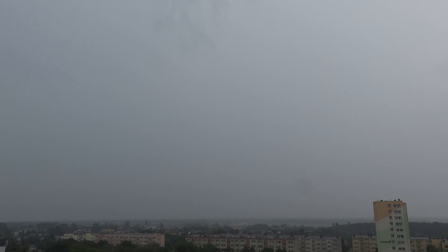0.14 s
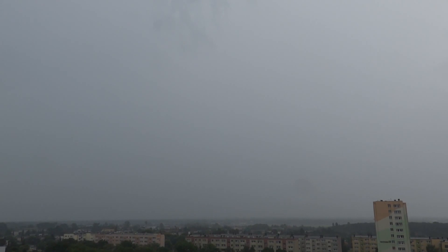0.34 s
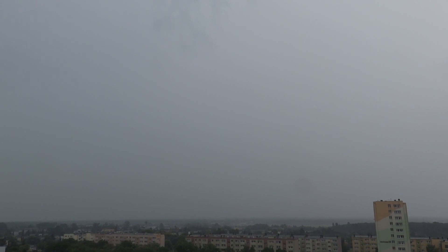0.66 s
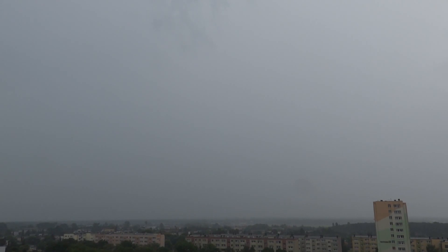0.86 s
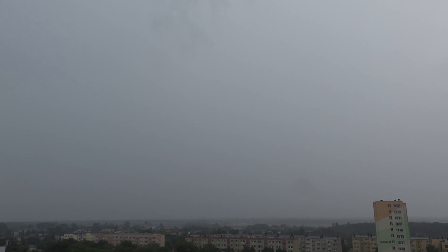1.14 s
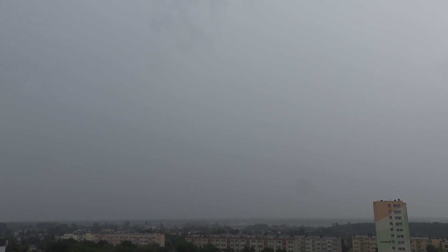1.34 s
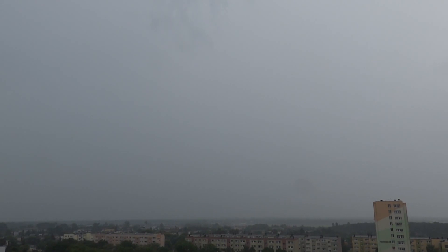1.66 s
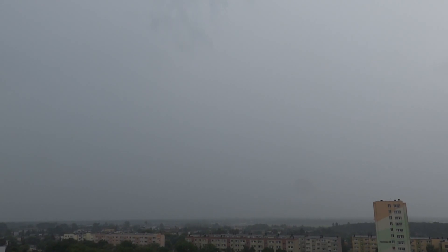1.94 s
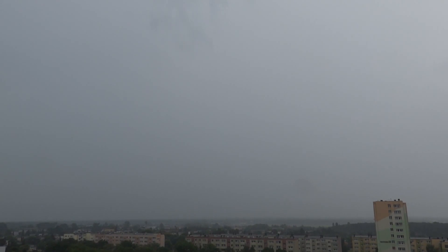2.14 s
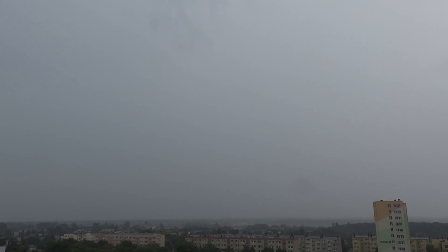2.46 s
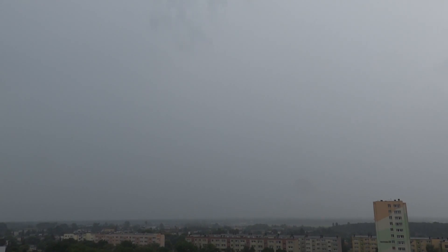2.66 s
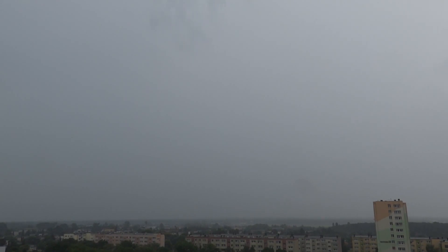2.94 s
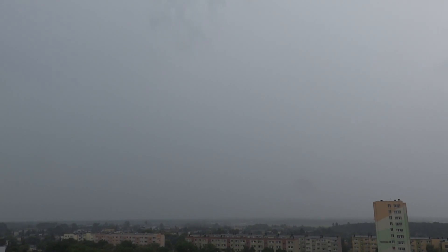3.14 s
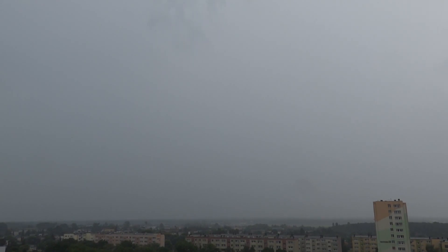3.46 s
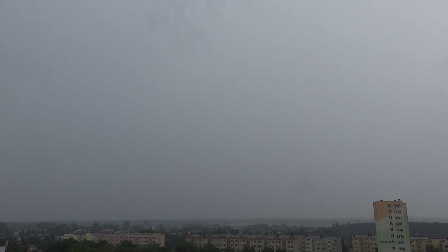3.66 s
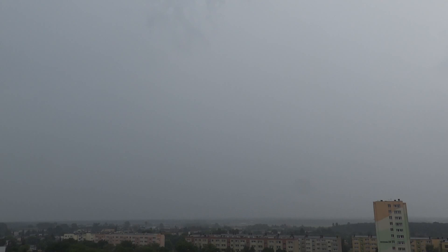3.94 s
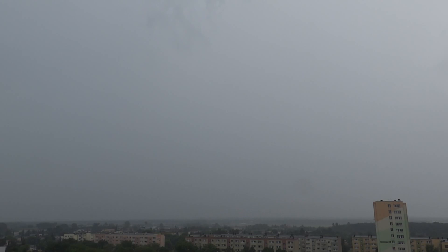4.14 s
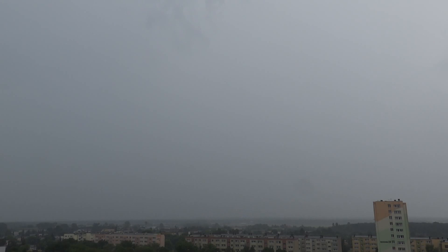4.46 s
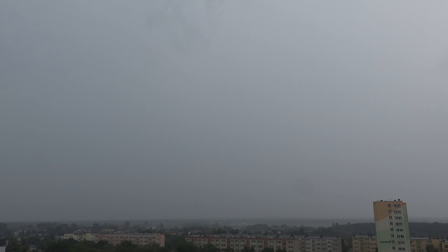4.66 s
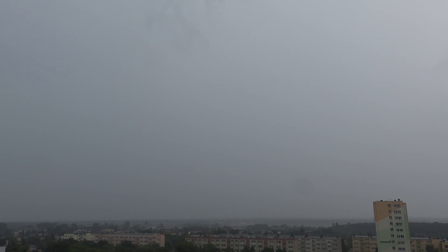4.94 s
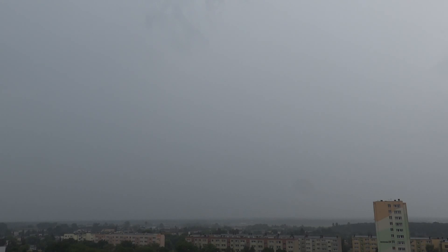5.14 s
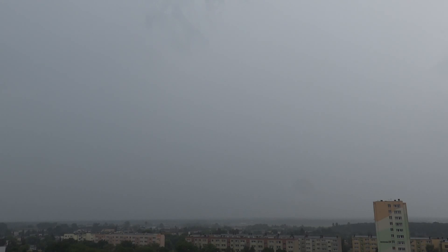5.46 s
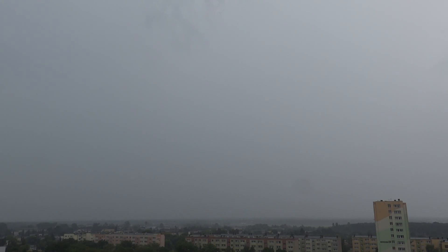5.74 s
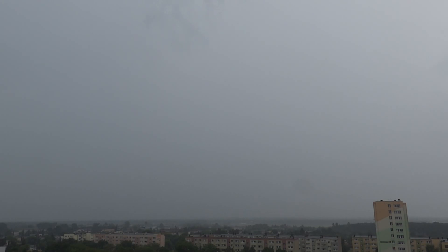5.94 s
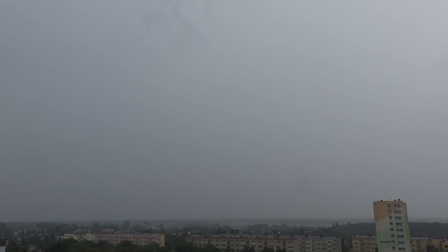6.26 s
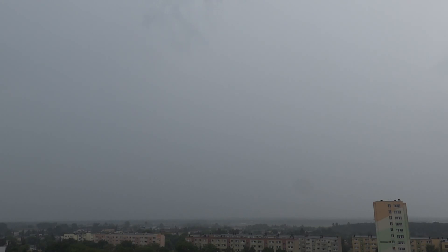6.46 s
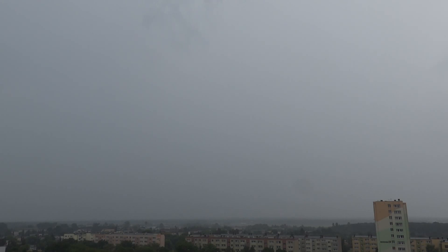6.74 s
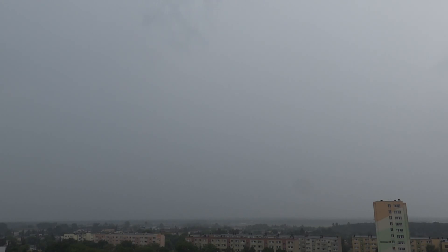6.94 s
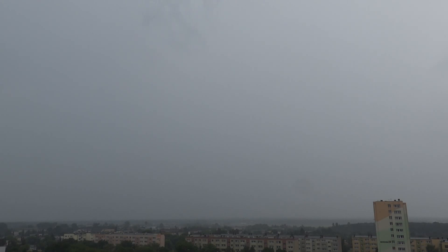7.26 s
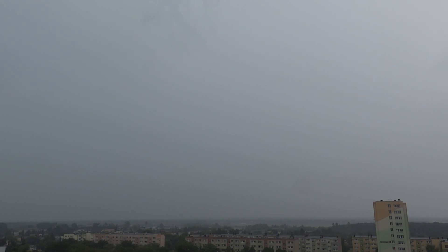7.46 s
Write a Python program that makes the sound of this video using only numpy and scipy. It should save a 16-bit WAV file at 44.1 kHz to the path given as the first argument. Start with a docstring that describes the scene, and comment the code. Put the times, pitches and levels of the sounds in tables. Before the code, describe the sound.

Dense rain hiss with scattered close taps and dull metallic thuds, until a loud rolling thunderclap bursts in and is still rumbling at the cut.

```python
"""Steady rain over a town, heard from a high open window: random impacts merge into wash and hiss.
Fat drops, bursts of noise with a short ring, smack on the sill close by; others thud on ledges
farther off, and a decaying noise tail lets the room answer each one. Near the end thunder breaks:
a stream of shock waves in several peals, booming in the window recess.
A faint wavering sine drone and a narrow band of deep noise lie under it all."""
import sys
import numpy as np
from scipy import signal
from scipy.fft import rfft, irfft, next_fast_len
from scipy.io import wavfile
from scipy.ndimage import uniform_filter1d, map_coordinates

SR = 44100
rng = np.random.default_rng(int(sys.argv[2]) if len(sys.argv) > 2 else 0)


def store_wav(level_fs):
    """Save 16-bit WAV to argv[1]."""
    pcm = np.round(np.clip(np.atleast_2d(level_fs), -1, 1) * 32767)
    wavfile.write(sys.argv[1], SR, pcm.T.astype(np.int16))


N = 334719  # samples

# relative spectrum of the sharp tick of a drop close by: (f/Hz, level/dB)
TICK_SPECTRUM = [(300, -27), (1500, -14), (4500, -8), (6000, 0), (8000, -1), (10000, -2), (12000, -15.5),
                 (16000, -23)]
# relative spectrum of the duller knock of a drop on the sill: (f/Hz, level/dB)
SILL_SPECTRUM = [(80, -44), (250, -27.5), (450, -7.5), (800, 1), (1200, 2.5), (1800, 0), (2700, 0),
                 (4500, -7.5), (9000, -30)]


def rain():
    """Countless far drops merge into a wash and a hiss; nearer ones patter and plink through."""
    # wash on roofs and trees: (t/s, level/dB)
    wash_levels = [(0.0, -40), (1.05, -41), (1.37, -37.5), (1.87, -38), (2.19, -39.5), (2.8, -39),
                   (3.4, -41), (3.96, -40), (4.44, -38), (4.78, -36.5), (5.13, -37.5), (6.4, -38.5)]
    # fine hiss: (t/s, level/dB)
    hiss_levels = [(0.0, -45.5), (1.96, -44.5), (2.51, -45), (5.62, -43), (5.85, -44), (7.04, -40.5),
                   (7.31, -45), (7.59, -43.5)]
    # relative spectrum of the wash: (f/Hz, level/dB)
    wash_spectrum = [(35, -46), (60, -30), (123, -23), (200, -14), (280, -9.5), (370, -8), (550, -4),
                     (1020, 0.5), (1500, -1.5), (2400, -3.5), (5000, -17), (6500, -43), (11000, -120)]
    # relative spectrum of the hiss: (f/Hz, level/dB)
    hiss_spectrum = [(1500, -21), (3500, 1.5), (5000, -0.5), (7000, -1), (9500, -2), (11000, -10.5),
                     (12500, -20), (15500, -28.5)]

    wash_db, = curves(wash_levels)
    hiss_db, = curves(hiss_levels)
    wash_drops = patchy(impacts(rate=9000, spread_db=2), depth_db=1.0)
    wash = unit(coloured(wash_drops, wash_spectrum))
    hiss_drops = patchy(impacts(rate=20000, spread_db=0.5), depth_db=1.0)
    hiss = unit(coloured(hiss_drops, hiss_spectrum))
    patter = unit(coloured(impacts(rate=110, spread_db=3.5), SILL_SPECTRUM))
    gutters = unit(coloured(plinks(rate=110, pitch_hz=1508, t60=0.046), SILL_SPECTRUM))
    ticks = unit(coloured(impacts(rate=70, spread_db=3), TICK_SPECTRUM))

    body = wash + amp(-11.5) * patter + amp(-12.0) * gutters
    body = amp(wash_db + 0.48 * wobble(9)) * body
    body = filtered(body, lambda hz: recess(hz, strength_db=-13.5))
    treble = amp(hiss_db) * (hiss + amp(-11) * ticks)
    return stereo(body + treble, lean_db=0.26)


def plinks(rate, pitch_hz, t60):
    """Small drops set gutters and puddles ringing briefly, each at its own pitch."""
    chance = rng.random((int(rate * N / SR), 4))
    start, pitch, size, side = chance.T[:, :, None]
    t = np.arange(SR // 20) / SR
    hz = pitch_hz * 2 ** (2.5 * (pitch - 0.5))  # spread over 2.5 octaves
    rings = amp(8.2 * size) * np.sin(2 * np.pi * hz * t) * decay(t, t60)
    where = ((start * N).astype(int) + np.arange(len(t))).ravel()
    channels = (rings, rings * np.sign(side - 0.5))
    return unit(np.array([np.bincount(where, r.ravel(), N)[:N] for r in channels]))


def sill():
    """A fat drop ticks sharply and knocks the sill, the knock varying far less; some burst into droplets."""
    # fat drops on the near sill: (t/s, relative level of the tick/dB)
    fat_drops = [(0.4913, -20.5), (0.6579, -26), (0.6816, -18.5), (0.7414, -23.5), (1.2398, -25),
                 (1.502, -23.5), (1.8275, -21), (1.9608, -23), (1.9971, -17), (2.1844, -26),
                 (2.3555, -24.5), (2.4989, -25.5), (2.8085, -24), (2.8481, -18.5), (2.9063, -21),
                 (2.9257, -23), (2.9637, -17), (2.9961, -20.5), (3.1975, -18), (3.24, -14.5), (3.5002, -20),
                 (3.5626, -16), (3.599, -26), (3.7534, -20.5), (3.7996, -24), (3.8414, -16), (3.8506, -14),
                 (3.9551, -24), (4.4765, -19), (4.5885, -25.5), (4.804, -15.5), (4.8962, -24),
                 (5.0669, -23.5), (5.1939, -18), (5.3168, -23.5), (5.3895, -20.5)]
    # drops that burst into spatter: (t/s, relative level/dB, time to fall to 1/e/s)
    bursts = [(7.123, -35.5, 0.059), (7.189, -33.5, 0.025), (7.568, -38.5, 0.033)]
    tick_hz, tick_scatter = 7000, 0.1  # middle ring of a tick; its scatter from drop to drop (share)
    knock_db, knock_grows = -5, 0.35  # knock for a 0 dB table entry; dB it gains per dB of entry

    ticks, knocks = np.zeros((2, 2, N))
    pitches = tick_hz * np.exp(tick_scatter * rng.standard_normal(len(fat_drops)))
    for (s, db), hz in zip(fat_drops, pitches):
        tick = with_ring(smack(t60=0.0077, wet_db=-2.0), hz, t60=0.0028, db=2.0)
        add(ticks, s, amp(db + 8.0) * tick)
        knock = smack(t60=0.0094, wet_db=4.0)
        add(knocks, s, amp(knock_db + knock_grows * db) * knock)
    t = np.arange(SR // 4) / SR
    for s, db, length in bursts:
        add(ticks, s, amp(db) * np.exp(-t / length) * rng.standard_normal((2, len(t))))
    return stereo(coloured(ticks, TICK_SPECTRUM) + coloured(knocks, SILL_SPECTRUM), lean_db=-0.5)


def ledges():
    """Drops on farther sheet metal arrive as dull thuds, each ledge stressing its own pitch."""
    # heavy drops on farther ledges: (t/s, relative level/dB, strongest ring f/Hz)
    heavy_drops = [(1.129, -28, 1140), (1.159, -26, 1010), (1.321, -24.5, 580), (1.332, -21, 563),
                   (1.503, -34, 727), (1.612, -28.5, 666), (1.748, -23, 1280), (1.768, -24, 1280),
                   (1.996, -26.5, 1080), (3.168, -25, 1300), (4.033, -21.5, 1124), (4.047, -24.5, 685),
                   (4.212, -24.5, 1180), (4.237, -25, 736), (4.617, -28, 1310), (5.967, -29.5, 1340)]
    # relative spectrum of a thud: (f/Hz, level/dB)
    ledge_spectrum = [(80, -54), (250, -39), (450, -9.5), (680, -0.5), (900, -8), (1200, 1), (1700, -9.5),
                      (3000, -12.5), (8000, -38)]

    thuds = np.zeros((2, N))
    for s, db, hz in heavy_drops:
        thud = with_ring(smack(t60=0.094, wet_db=-2), hz, t60=0.056, db=9.5)
        add(thuds, s, amp(db + 14.5) * thud)
    return stereo(coloured(thuds, ledge_spectrum), lean_db=-1.0)


def smack(t60, wet_db):
    """One drop: a short noise splash with a fast rise, then the room's answer."""
    tail = room_tail()
    t = np.arange(tail.shape[1]) / SR
    rise = 1 - np.exp(-t / 0.00054)
    splash = rng.standard_normal(tail.shape) * rise * decay(t, t60)
    splash = splash / np.linalg.norm(splash[0])
    return splash * [[1], [0.5]] + amp(wet_db) * tail


def with_ring(blow, hz, t60, db):
    """A blow plus the short ring that it excites at one pitch."""
    t = np.arange(SR // 20) / SR
    mode = decay(t, t60) * np.cos(2 * np.pi * hz * t)
    kernel = mode[None] / np.abs(mode).sum()
    ring = signal.fftconvolve(blow, kernel, axes=1)[:, :blow.shape[1]]
    return blow + amp(db) * ring


def room_tail():
    """A fresh two-channel room answer: noise that decays at a rate set by frequency, energy 1."""
    # reverberation of the room: (f/Hz, time to fall 60 dB/s)
    room_t60 = [(200, 0.26), (1000, 0.32), (4000, 0.22), (8000, 0.26), (15000, 0.16)]
    hz, t, z = signal.stft(rng.standard_normal((2, SR // 2)), SR, nperseg=256)
    fading = z * decay(t, along(room_t60, hz)[:, None])
    tail = signal.istft(fading, SR, nperseg=256)[1]
    return tail / np.linalg.norm(tail[0])


def thunder():
    """A roll of booming and crackling shocks; long straight stretches of the channel arrive at once as claps."""
    # thunder claps: (t/s, boom level/dB, hold/s, crackle level relative to the boom/dB)
    claps = [(6.441, -36, .03, -6), (6.587, -31, 0.025, -16), (6.644, -25.5, 0.058, 0),
             (6.798, -17, 0.031, -3.5), (6.951, -17.5, 0.042, -12), (7.106, -20, 0.031, -2),
             (7.147, -18.5, 0.06, -6), (7.313, -22, 0.013, 6), (7.39, -17, 0.072, -8),
             (7.552, -18, 0.016, -10)]
    # the roll under the claps builds, sags, builds again and falls: (t/s, level/dB)
    roll_levels = [(6.42, -54), (6.57, -41), (6.67, -26.5), (6.94, -21.5), (7.05, -25.5), (7.32, -18.5),
                   (7.59, -25.5)]
    # relative spectrum of the boom: (f/Hz, level/dB)
    boom_spectrum = [(20, -46), (40, -25), (55, -41), (80, -19.5), (130, -14), (170, -8.5), (230, -1.5),
                     (295, -4), (350, -1.5), (560, -4), (800, -7.5), (1200, -22.5), (2500, -64)]
    # relative spectrum of the crackle: (f/Hz, level/dB)
    crackle_spectrum = [(200, -24.5), (500, -8.5), (800, -1), (1150, -3.5), (1600, -9), (2100, -18.5),
                        (3000, -37), (6000, -63)]
    attack_s, release_s = 0.0039, 0.028
    crackle_base_db, crackle_grows = -1, 1.007  # crackle in a 0 dB roll; dB it gains per dB of roll

    roll_db, = curves(roll_levels)
    arrival = np.clip((np.arange(N) / SR - roll_levels[0][0]) / attack_s, 0, 1)
    boom, crackle = arrival * amp([roll_db, crackle_base_db + crackle_grows * roll_db])
    for s, db, hold, crackle_db in claps:
        surge = amp(db) * clap(s, hold, attack_s, release_s)
        boom = np.hypot(boom, surge)
        crackle = np.hypot(crackle, amp(crackle_db) * surge)

    booming = boom * shocks(rate=1500, spread_db=3, spectrum=boom_spectrum)
    crackling = crackle * shocks(rate=1200, spread_db=1.0, spectrum=crackle_spectrum)
    front, scatter = booming + crackling
    # long waves reach both sides alike
    scatter = amp(-5.0) * filtered(scatter, lambda hz: hz / np.hypot(hz, 300))
    return stereo(np.array([front, scatter]), lean_db=0.6)


def clap(s, hold, attack_s, release_s):
    """Envelope of one clap: a fast attack, a hold, a release."""
    age = np.maximum(np.arange(N) / SR - s, 0)
    rise = 1 - np.exp(-age / attack_s)
    return rise * np.exp(-np.maximum(age - hold, 0) / release_s)


def shocks(rate, spread_db, spectrum):
    """Shock waves from kinks of the lightning channel, dulled by the air, at an even mean strength."""
    # paths through cloud and streets interfere
    scattered = patchy(impacts(rate, spread_db), depth_db=0.5)
    waves = filtered(coloured(scattered, spectrum), lambda hz: recess(hz, strength_db=2))
    power = np.abs(uniform_filter1d(waves ** 2, size=2000, axis=1))
    return waves / np.sqrt(power + 1e-9)


def recess(hz, strength_db):
    """Response at the window: the direct sound plus the resonant air modes of the recess."""
    # air modes of the window recess: (f/Hz, width/Hz, relative level/dB)
    air_modes = [(162, 9, 4), (214.5, 4.6, 7.5), (369.8, 8.6, 8.5), (410, 8.1, 0), (471, 12, -1),
                 (518, 6.1, 4), (562.5, 8, 8), (646, 3.7, 6.5), (748.6, 13.4, 4), (904, 10, -0.5),
                 (1165, 19, -5), (1337, 7.5, -6)]
    modes = 0
    for centre, width, db in air_modes:
        damping = 1j * hz * width
        modes = modes + amp(db) * damping / (centre * centre - hz * hz + damping)
    return 1 + amp(strength_db) * modes


def town():
    """A faint low drone wavers in pitch and level, swells and fades over a deep narrow-band rumble."""
    # swells of the drone: (t/s at the top, rise/dB, time from the top to 1/e of the rise/s)
    swells = [(3.3, 10.5, 0.16), (3.72, 6, .13), (4.828, 13, 0.22)]
    # deep rumble: (t/s, level/dB)
    rumble_levels = [(4.8, -85), (5.1, -75)]
    drone_hz, rest_db = 83, -77  # middle pitch; mean level between swells

    t = np.arange(N) / SR
    drone_db = rest_db + sum(db * np.exp(-((t - s) / half) ** 2) for s, db, half in swells)
    phase = 2 * np.pi * np.cumsum(drone_hz + 2 * wobble(23)) / SR
    drone = amp(drone_db + 1.7 * wobble(10.0)) * unit(np.sin(phase))
    rumble_db, = curves(rumble_levels)
    rumble = unit(filtered(rng.standard_normal(N), lambda hz: np.exp(-((hz - 40) / 5) ** 2)))
    return drone + amp(rumble_db) * rumble


def stereo(pair, lean_db):
    """Two unrelated signals become left and right of a closely spaced microphone pair."""
    # likeness of the two microphones: (f/Hz, left-right correlation)
    likeness = [(100, 1), (300, 0.97), (640, 0.95), (1400, 0.86), (2800, 0.81), (4500, 0.87), (8000, 0.91),
                (12000, 0.88)]

    def mid_and_side(hz):
        turn = np.arccos(np.clip(along(likeness, hz), -1, 1)) / 2
        return np.array([np.cos(turn), np.sin(turn)])

    mid, side = filtered(pair, mid_and_side)
    return np.array([mid + side, mid - side]) * amp([[lean_db / 2], [-lean_db / 2]])


def impacts(rate, spread_db):
    """Two streams of randomly timed impulses, rate a second, of scattered size and sign, rms 1."""
    hit = rng.random((2, N)) < rate / SR
    size = amp(spread_db * np.clip(rng.standard_normal((2, N)), -2, 2))
    return unit(hit * size * rng.choice([-1, 1], (2, N)))


def patchy(pair, depth_db):
    """Gain that drifts in patches of time and frequency, alike in both channels; rms 1."""
    z = signal.stft(pair, nperseg=512)[2]
    field = uniform_filter1d(rng.standard_normal(z.shape[1:]), size=7, axis=0)
    field = uniform_filter1d(field, size=10, axis=1)
    return unit(signal.istft(z * amp(depth_db * unit(field)), nperseg=512)[1][:, :N])


def coloured(x, spectrum, size=8192):
    """x through a causal minimum-phase filter of energy 1 with the shape of the spectrum."""
    cepstrum = irfft(np.log(amp(along(spectrum, np.fft.rfftfreq(size, 1 / SR)))))
    cepstrum[1:size // 2] *= 2  # fold the cepstrum onto positive times
    cepstrum[size // 2 + 1:] = 0
    kernel = irfft(np.exp(rfft(cepstrum)))
    return signal.fftconvolve(x, kernel[None] / np.linalg.norm(kernel), axes=1)[:, :N]


def filtered(x, response):
    """x times a complex response of frequency."""
    m = next_fast_len(N + SR // 2)
    return irfft(rfft(x, m) * response(np.fft.rfftfreq(m, 1 / SR)), m)[..., :N]


def add(track, s, sound):
    """Mix a sound into the track at time s."""
    part = track[:, max(round(s * SR), 0):][:, :sound.shape[1]]
    part += sound[:, :part.shape[1]]


def decay(t, t60):
    """Exponential decay that falls 60 dB in t60 seconds."""
    return np.exp(-np.log(1000) * t / t60)


def wobble(rate):
    """A smooth random curve, rate knots a second."""
    knots = rng.standard_normal(int(N * rate / SR) + 4)
    return map_coordinates(knots, [np.arange(N) * rate / SR])


def curves(rows):
    """One value per sample for each column after the time."""
    s, *cols = np.transpose(rows)
    return [np.interp(np.arange(N) / SR, s, c) for c in cols]


def along(points, hz):
    """(f/Hz, value) points interpolated on a log frequency axis."""
    f, v = np.transpose(points)
    return np.interp(np.log(hz + 1), np.log(f + 1), v)


def amp(db):
    """Amplitude factor of a level in dB."""
    return 10 ** (np.asarray(db) / 20)


def unit(x):
    """x scaled to rms 1."""
    return x / np.sqrt(np.mean(x ** 2) + 1e-20)


def scene():
    """The rain, the drops close by and farther off, the thunder and the town at the open window."""
    return rain() + sill() + ledges() + thunder() + town()


def record(dry):
    """The recorder keeps nothing at or above its band limit."""
    top_hz = 15900
    return filtered(dry, lambda hz: hz < top_hz)


dry = scene()
out = record(dry)
store_wav(out)
```